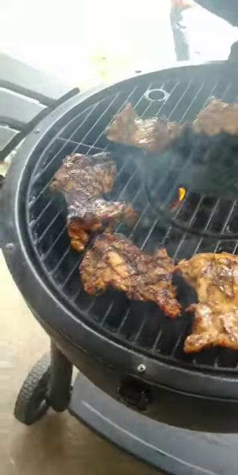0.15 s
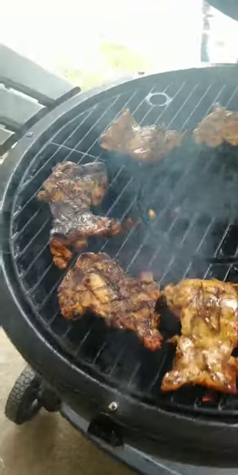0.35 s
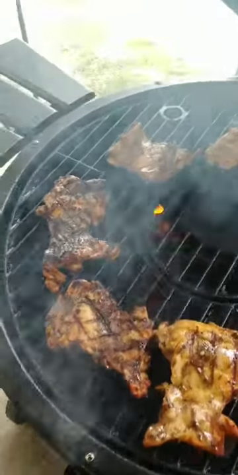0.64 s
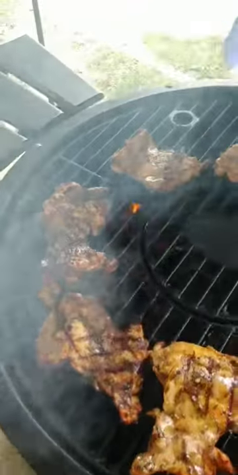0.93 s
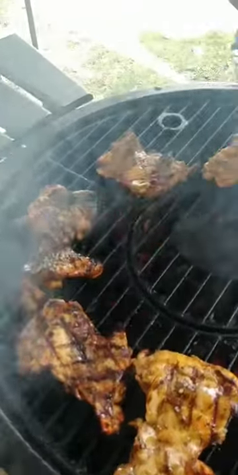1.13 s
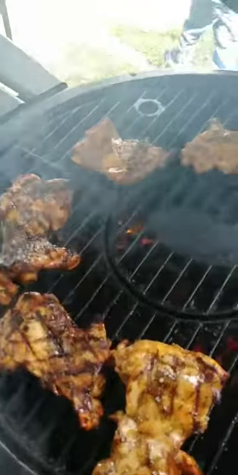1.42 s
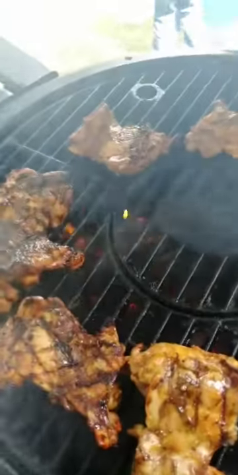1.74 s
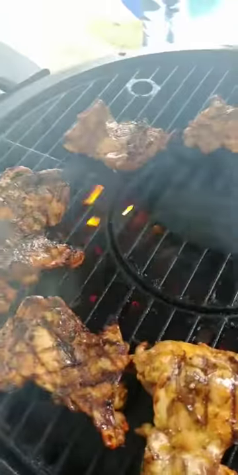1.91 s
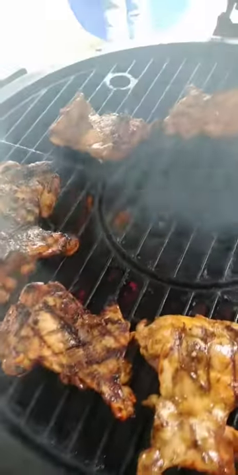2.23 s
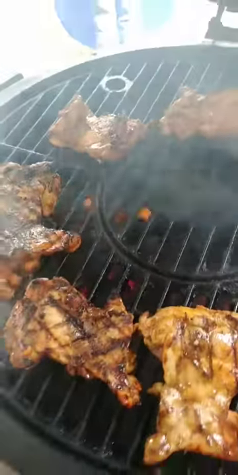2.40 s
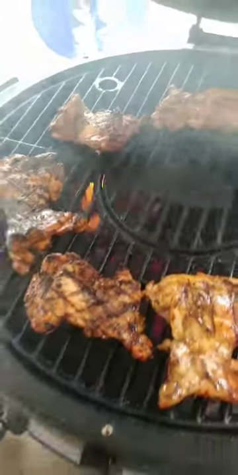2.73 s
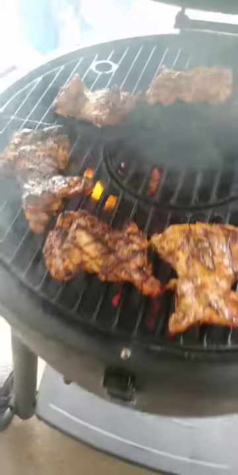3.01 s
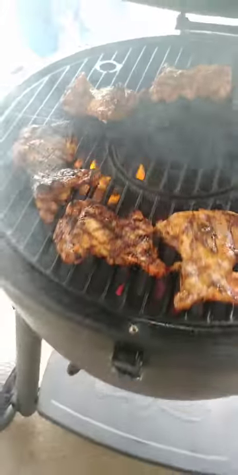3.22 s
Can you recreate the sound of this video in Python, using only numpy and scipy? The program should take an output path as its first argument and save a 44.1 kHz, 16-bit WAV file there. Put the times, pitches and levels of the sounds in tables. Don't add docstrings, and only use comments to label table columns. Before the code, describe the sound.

Bright, steady sizzling of grilling meat, with crisp fat pops over a low flutter of flames.

```python
import sys
import numpy as np
from scipy import signal
from scipy.fft import rfft, irfft
from scipy.io import wavfile
from scipy.ndimage import uniform_filter1d

SR = 44100
rng = np.random.default_rng(int(sys.argv[2]) if len(sys.argv) > 2 else 0)


def store_pcm(level_fs):
    pcm = np.round(np.clip(level_fs, -1, 1) * 32767).astype(np.int16)
    wavfile.write(sys.argv[1], SR, np.atleast_2d(pcm).T)


def convert_level_to_amplitude(level_db):
    exponent = np.asarray(level_db, float) / 20
    return 10 ** exponent


N = 147735
T = np.arange(N) / SR
BIN_HZ = np.arange(N // 2 + 1) * SR / N


def unit(x):
    return x / np.sqrt(np.mean(x ** 2))


def band(x, lo_hz, hi_hz):
    return signal.sosfilt(signal.butter(2, [lo_hz, min(hi_hz, SR / 2.1)], "band", fs=SR, output="sos"), x)


def pass_bins(spec, lo_hz, hi_hz):
    return irfft(spec * (BIN_HZ > lo_hz) * (BIN_HZ < hi_hz), N)


def shape(x, table):
    table_hz, table_db = np.array(table).T
    hz = np.maximum(BIN_HZ, 1)
    gain = convert_level_to_amplitude(np.interp(np.log(hz), np.log(table_hz), table_db))
    return irfft(rfft(x) * gain * np.minimum(hz / table_hz[0], 1) ** 2, N)


def follow(table):
    return np.interp(T, *np.array(table).T)


def walk(rate_hz):
    k = int(SR / rate_hz)
    steps = np.repeat(rng.standard_normal(N // k + 1), k)
    return unit(uniform_filter1d(uniform_filter1d(steps, k), k)[:N])


def bubbles():
    count, life_cycles = 5000, 65
    start, octave, size = rng.random((count, 3)).T
    hz = 2500 * 2 ** (2.7 * octave[:, None])
    t = T[:256]
    turns = hz * t
    tone = np.sin(2 * np.pi * turns * (1 + 0.02 * turns / life_cycles))
    grain = tone * turns * convert_level_to_amplitude(-50 * turns / life_cycles)
    level = hz / 8000 * convert_level_to_amplitude(4 * size[:, None])
    at = (start[:, None] * N).astype(int) + np.arange(len(t))
    return unit(np.bincount(at.ravel(), (grain * level).ravel(), N + len(t))[:N])


def sizzle():
    # (time [s], level [dB], treble tilt [dB/octave], hump [dB], hollow below it [dB])
    boil = [(0, -41, -0.5, -1.5, -2), (.2, -41.5, 2, 0, 2), (.35, -42, 0.8, 2.5, -3),
            (.5, -42, 0.5, 0.5, -1.5), (.54, -38, 1, 1.5, -4.5), (.69, -36.5, 1, -2, -3),
            (.8, -39.5, 1, 0.5, -1), (1.05, -37.5, 1, 0, -1.5), (1.1, -38, 0.5, -2, -1.5),
            (1.44, -40.5, 0, -1, 0.5), (1.48, -36.5, 2, 0, -2), (1.9, -35, 1.5, -1.5, -1),
            (2.05, -36.5, 1.5, -1.5, -0.5), (2.3, -38.5, 1.5, -0.5, 1), (2.55, -39.5, 1.2, 1.5, -1),
            (2.9, -42, 2.2, 3.5, 1), (3.1, -41, 2, 2.5, 1.5), (3.35, -42, 0, 0.5, -1.5)]
    # (frequency [Hz], spectral density [dB per Hz])
    fizz = [(2050, -14.5), (2700, -6.5), (4600, -6.5), (6200, -1.5), (8700, -6), (10300, 0), (14300, -0.5),
            (15600, -4.5)]
    bursts_per_s, burst_spread_db, bubble_db, steam_db = 11000, 2.5, -7.5, -1
    chance, sign, size = rng.random((3, N))
    bursts = (chance < bursts_per_s / SR) * np.sign(sign - .5) * convert_level_to_amplitude(-burst_spread_db * np.log(size + 2e-3))
    steam = convert_level_to_amplitude(steam_db) * rng.standard_normal(N)
    raw = shape(unit(bursts) + convert_level_to_amplitude(bubble_db) * bubbles() + steam, fizz)

    s, db, tilt, hump_db, hollow_db = np.array(boil).T
    tilt_db = np.interp(T, s, tilt)
    shared = .15 * walk(5.54) + 0.5 * walk(10) + 0.23 * walk(40)
    spec = rfft(raw)
    out = 0
    for octave in np.arange(-4, 2, .5):
        part = np.cos(np.pi * np.clip(np.log2(BIN_HZ / 8000 + 1e-9) - octave, -.5, .5)) ** 2
        flicker = shared + 0.36 * walk(6.0) + 0.53 * walk(30.37)
        out = out + irfft(spec * part, N) * convert_level_to_amplitude(tilt_db * octave + flicker)

    spec = rfft(out)
    for lo_hz, hi_hz, gain_db in ((5100, 7300, hump_db), (3800, 5100, hollow_db)):
        out = out + (convert_level_to_amplitude(np.interp(T, s, gain_db)) - 1) * pass_bins(spec, lo_hz, hi_hz)
    return out / np.sqrt(np.mean(raw ** 2)) * convert_level_to_amplitude(np.interp(T, s, db))


def ring(x, hz, t60_s):
    pole = np.exp(2j * np.pi * hz / SR - np.log(1000) / (max(t60_s, 1e-3) * SR))
    return signal.lfilter([1], [1, -pole], x).imag


def bowl(x):
    # (frequency [Hz], level [dB], t60 [s])
    modes = [(125, -9, 0.12), (336.5, -5.5, 0.053), (429, -11, 0.029), (552, -13, 0.014),
             (640, -4.5, 0.035), (795, -25, 0.017), (874, -5.5, 0.032), (992, -7, 0.029), (1107, -5, 0.029),
             (1166, -5.5, 0.021), (1400, -25, 0.03), (1760, -11.5, 0.034)]
    return sum(convert_level_to_amplitude(db) * ring(x, hz, t60_s) for hz, db, t60_s in modes)


def air():
    # (frequency [Hz], spectral density [dB per Hz])
    air_colour = [(30, -8.5), (54, 2.5), (77, -0.5), (175, -7.5), (398, -19.5), (830, -18), (996, -23.5),
                  (1390, -15.5), (2000, -22), (2600, -84), (4400, -120)]
    # (time [s], level [dB])
    roar_levels = [
        (0, -1.5),
        (.4, -1.5),
        (.55, 3),
        (1.2, 3),
        (1.65, 1.5),
        (1.85, 2),
        (2.6, -1),
        (3.35, 1.5),
    ]
    # (time [s], level [dB])
    flame = [(0, 2.5), (.12, -1.5), (.25, 0), (.45, 2.5), (.8, -1), (1.15, 4.5), (1.4, 0), (1.6, 4),
             (1.85, -1.5), (1.95, 2.5), (2.3, 2), (2.5, 2.5), (2.65, -1.5), (2.78, 1), (2.95, -2),
             (3.1, 0.5), (3.35, -1)]
    air_db, flutter_db, bowl_hum_db = -54, 2.5, -68
    noise = shape(rng.standard_normal(N), list(air_colour)[:8] + [(6000, -38.5)])
    low = signal.sosfilt(signal.butter(2, 280, fs=SR, output="sos"), noise)
    roar = convert_level_to_amplitude(follow(roar_levels) + 1.05 * walk(10.38))
    flames = low * convert_level_to_amplitude(follow(flame) + flutter_db * walk(14)) + (noise - low) * roar
    hum = unit(band(bowl(rng.standard_normal(N)), 580, 1120))
    return convert_level_to_amplitude(air_db) * unit(flames) + convert_level_to_amplitude(bowl_hum_db) * roar * hum


def spits():
    # (time [s], peak level [dB], pitch [Hz])
    droplets = [(.0368, -28, 7200), (0.079, -23, 11000), (.1923, -40, 11000), (.287, -37, 6200),
                (.328, -24, 10000), (.3515, -25, 11000), (.4058, -26, 10000), (0.694, -21, 12000),
                (.8208, -28.5, 7000), (.8476, -37, 6200), (1.4843, -23, 12000), (1.6255, -25, 12000),
                (1.658, -22, 11000), (1.6964, -34, 11300), (2.1621, -27, 12000), (2.2169, -21, 12000),
                (2.3312, -28, 12000), (2.3561, -33, 6200), (2.538, -29, 6200), (2.8998, -29, 11000),
                (2.9161, -32, 11000), (2.9552, -32, 6000), (2.9688, -29, 11000), (3.08, -32, 10000),
                (3.085, -30, 11000), (3.1714, -28, 11000), (3.268, -26, 11000)]
    t60_s, gain_db = 0.0013, 1.2
    out, t = np.zeros(N), T[:256]
    decay = np.exp(-np.log(1000) * t / t60_s)
    for s, db, hz in droplets:
        i = int(s * SR)
        tick = band(rng.standard_normal(len(t)) * decay, hz / 1.3, hz * 1.43)
        out[i:i + len(t)] += convert_level_to_amplitude(db + gain_db) * tick / np.abs(tick).max()
    return out


def thumps():
    # (time [s], peak level [dB], pitch [Hz])
    flares = [(0.395, -42.5, 176), (.6935, -33.5, 365), (.701, -38.5, 131), (.7035, -30.5, 424),
              (.704, -35, 634), (.72, -41, 313), (.733, -42, 139), (.75, -45, 306), (0.77, -46, 139),
              (0.784, -51, 148), (0.811, -51, 152), (0.842, -49, 160), (.855, -51, 410), (.857, -51, 640),
              (.925, -45.5, 159), (0.974, -45.5, 387), (0.998, -51, 296), (1.042, -53, 150),
              (1.135, -45, 125), (1.093, -47.5, 330), (1.093, -42.5, 115), (1.115, -50, 140),
              (1.132, -48.5, 338), (1.28, -44, 308), (1.374, -35, 300), (1.392, -52, 324),
              (1.493, -50.5, 129), (1.656, -42, 162), (1.725, -56, 197), (1.762, -48, 75), (1.91, -46, 68),
              (1.967, -44.5, 154), (1.966, -59, 886), (1.966, -53, 1460), (1.974, -45, 287),
              (2.168, -43.5, 145), (2.202, -45, 182), (2.43, -44, 161), (2.604, -33.5, 308),
              (2.613, -45, 129), (2.732, -45, 158), (2.862, -48.5, 306), (3.07, -45.5, 110),
              (3.07, -53.5, 870)]
    # (time [s], level [dB], length of the scrape [s], top frequency [Hz])
    knocks = [
        (0.695, -47.5, 0.011, 1100),
        (0.702, -46, 0.013, 1380),
        (.714, -54.5, 0.014, 1320),
        (0.73, -57.5, 0.031, 1320),
        (0.854, -60, 0.025, 700),
        (0.973, -59, 0.016, 900),
        (1.373, -58, 0.0068, 1400),
        (1.966, -60, 0.008, 1700),
        (2.603, -58, 0.0059, 980),
        (0.708, -51, .012, 3280),
    ]
    thump_s, low_stretch, echo_s, echo_db, crack_db = 0.0027, 0.22, .026, -14, 8.0
    out, push, t = np.zeros(N), np.zeros(N), T[:4096]
    for s, db, hz in flares:
        i = int(s * SR)
        age = t / (thump_s * (300 / hz) ** low_stretch)
        puff = -np.sin(2 * np.pi * hz * t) * age ** 2 * np.exp(-age)
        out[i:i + len(t)] += (convert_level_to_amplitude(db) * puff / np.abs(puff).max())[:N - i]
    rough = rng.standard_normal(N)
    for s, db, length_s, top_hz in knocks:
        scrape = rough * np.sin(np.pi * np.clip((T - s) / length_s, 0, 1))
        push += convert_level_to_amplitude(db - 9.0) * band(band(scrape, 93, top_hz), 54, top_hz * 1.9)
    lag = int(echo_s * SR)
    echo = convert_level_to_amplitude(echo_db) * np.concatenate([np.zeros(lag), out[:-lag]])
    return out + echo + bowl(push) + convert_level_to_amplitude(crack_db) * push


def scene():
    mono = sizzle() + air() + spits() + thumps()
    return np.array([mono, mono])


def band_limit(x):
    return signal.sosfilt(signal.butter(12, 15730, fs=SR, output="sos"), x)


def record(dry):
    # (time [s], low edge [Hz], high edge [Hz], level [dB])
    fills = [
        (1.2, 5160, 6300, -51),
        (1.41, 4700, 5800, -54),
        (1.41, 6900, 8200, -55),
        (1.99, 5200, 6280, -50),
        (1.99, 9700, 11200, -43),
        (2.64, 7600, 9700, -51),
        (2.64, 13100, 14600, -48),
        (2.803, 6860, 9000, -51),
        (2.803, 10300, 11800, -49),
    ]
    # (start [s], end [s], centre [Hz], width [Hz])
    holes = [(.05, .1, 1960, 130), (.088, .12, 2180, 250), (0.13, .175, 1800, 150), (.25, .275, 1950, 160),
             (.538, .562, 1850, 200), (.565, 0.672, 1980, 130), (.635, .66, 2170, 250),
             (.735, .76, 2750, 200), (.84, .865, 2110, 130), (0.865, .93, 1990, 130),
             (.918, .95, 1880, 220), (1.41, 1.442, 2200, 230), (1.54, 1.578, 2470, 250),
             (1.612, 1.648, 2190, 230), (1.725, 1.75, 1820, 150), (1.84, 1.865, 1990, 130),
             (2.075, 2.1, 1900, 250), (2.28, 2.305, 1990, 150), (2.325, 2.35, 1920, 250),
             (2.375, 2.4, 1990, 130), (2.465, 2.49, 1980, 130), (2.52, 2.565, 1980, 140),
             (2.535, 2.56, 2170, 240), (2.59, 2.61, 1980, 130), (2.605, 2.63, 2780, 200)]
    gap_from_s, gap_to_s, gap_fade_s, fill_s = .208, .2635, .0165, .02
    dry = signal.sosfilt(signal.butter(5, 52, "high", fs=SR, output="sos"), dry)
    out_of_gap = np.maximum(gap_from_s + gap_fade_s - T, T - gap_to_s + gap_fade_s) / gap_fade_s
    gate = np.sin(np.pi / 2 * np.clip(out_of_gap, 0, 1)) ** 2
    side = 0
    for s, lo_hz, hi_hz, db in fills:
        noise = unit(pass_bins(rfft(rng.standard_normal(N)), lo_hz, hi_hz))
        side = side + convert_level_to_amplitude(db) * noise * np.cos(np.pi / 2 * np.clip((T - s) / fill_s, -1, 1)) ** 2
    spec = rfft(dry[0])
    for start, end, centre_hz, width_hz in holes:
        edge = np.clip(np.minimum(T - start, end - T) / .012 + .5, 0, 1)
        dry = dry - edge * pass_bins(spec, centre_hz - width_hz / 2, centre_hz + width_hz / 2)
    limited = irfft(rfft(dry) * (BIN_HZ < 15720), N)
    mix = limited * gate + side * np.array([[1], [-1]])
    return band_limit(mix)


dry = scene()
out = record(dry)
store_pcm(out)
```